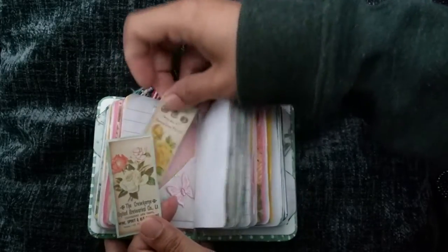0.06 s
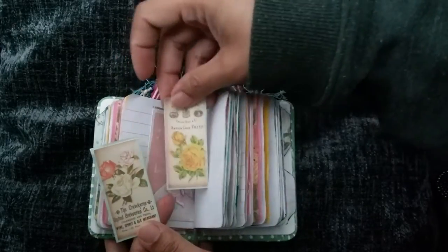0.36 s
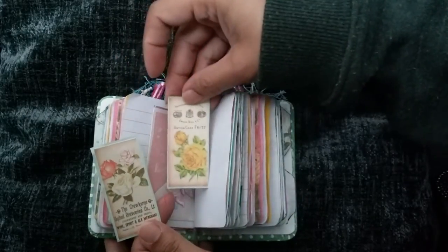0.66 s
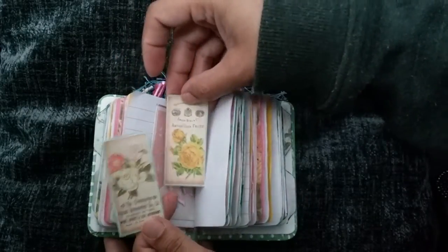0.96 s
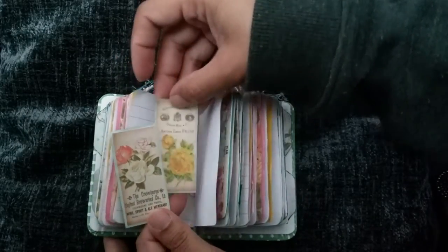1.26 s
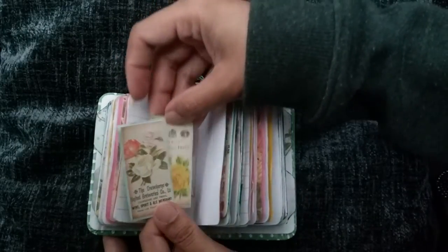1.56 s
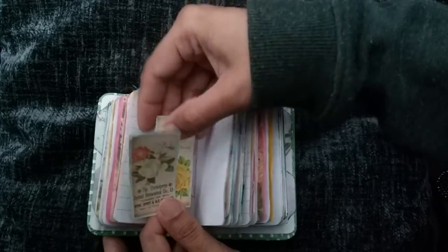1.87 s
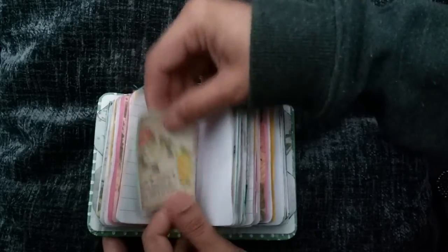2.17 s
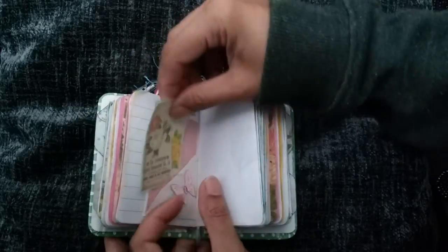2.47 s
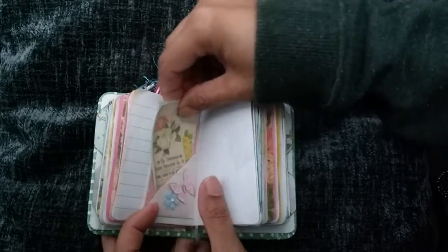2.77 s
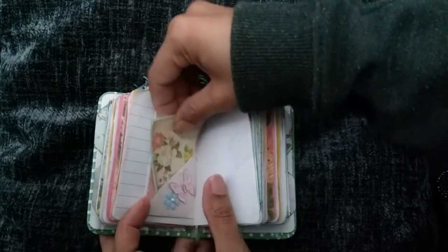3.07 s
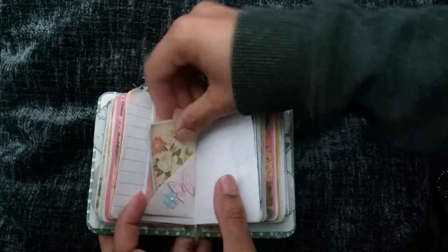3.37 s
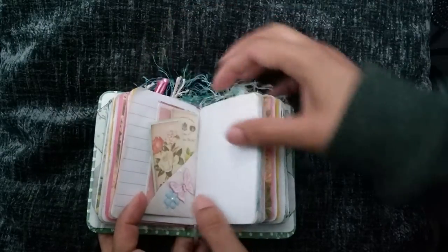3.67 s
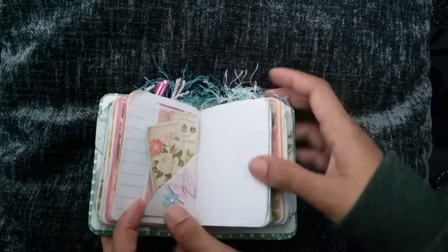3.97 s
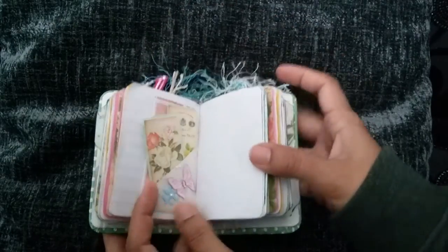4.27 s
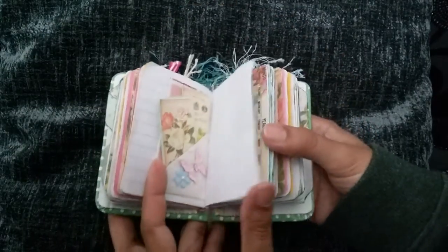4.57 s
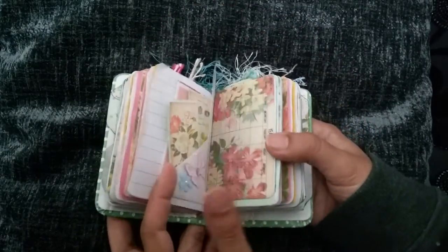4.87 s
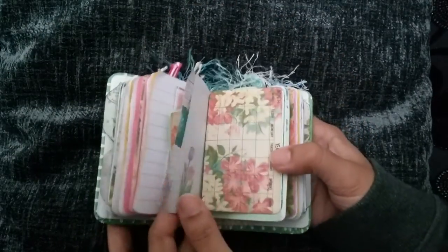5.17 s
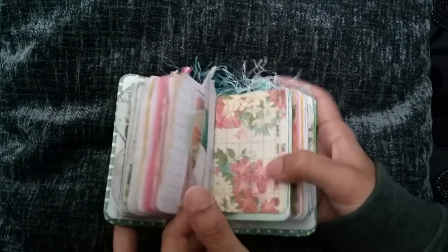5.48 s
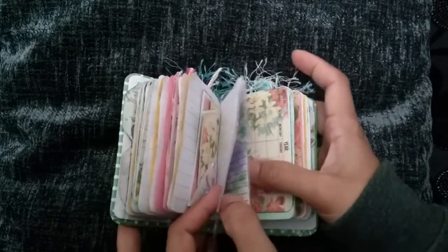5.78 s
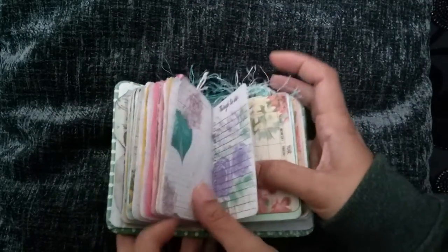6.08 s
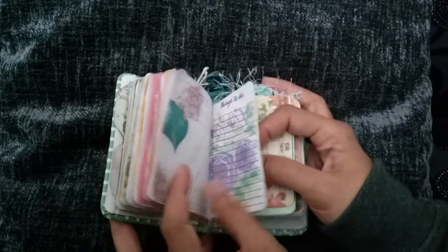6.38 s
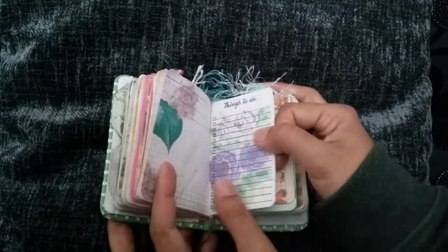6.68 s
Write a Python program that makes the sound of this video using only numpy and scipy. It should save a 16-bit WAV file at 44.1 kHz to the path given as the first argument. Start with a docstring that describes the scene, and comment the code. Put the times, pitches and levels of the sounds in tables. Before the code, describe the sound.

Two cards tap lightly together, then slide with a soft, uneven hiss into the paper pocket of a thick journal. Edges catch and flick, and fingers bump the book faintly. Pages then turn with a busier crinkling, one stiff page snaps over, and a few lighter rustles follow. It is all close to the microphone in a quiet room, over faint air noise, a low hum and a thin, high whine.

```python
"""Paper slides over paper: hands push two cards into the pocket of a thick journal, then turn its pages.
The paper hisses as it grips and slips, and bent sheets ring briefly. Edges catch and flick free,
one stiff page snaps over, the cards tap together and fingers bump the book.
It all happens close by in a quiet room, over faint air noise, a low hum and a thin electronic whine."""
import sys
import numpy as np
from scipy import signal
from scipy.fft import rfft, irfft
from scipy.io import wavfile

SR = 44100
rng = np.random.default_rng(int(sys.argv[2]) if len(sys.argv) > 2 else 0)


def persist_wave(psi):
    """Save psi, clipped to +-1, as 16-bit WAV."""
    counts = np.round(np.clip(psi, -1, 1) * 32767).astype(np.int16)
    wavfile.write(sys.argv[1], SR, np.atleast_2d(counts).T)


N = 305172


def sliding_paper(rise_curve=1.67, fall_curve=1.2):
    """Uneven friction hisses at the edge, shakes the free sheet and rubs through the stack of pages."""
    # One row per slide: cards are drawn, squared up and pushed home, then pages turn and are smoothed.
    # Columns: fastest_s, rise_s, fall_s, hiss_db, flutter_db, rub_db (the last two relative to the hiss)
    strokes = [ (.005, 0.025, 0.078, -59.5, -1, -14), (.165, 0.046, 0.03, -83, -8, 8),
               (.345, 0.019, 0.041, -63, 3, -1.5), (1.01, 0.04, 0.32, -72, -2.5, -2.5),
               (1.3, 0.089, .025, -70, 0, -5), (1.605, 0.066, 0.051, -69, 0, -6),
               (1.855, .04, 0.024, -66.5, -3, -14), (1.97, 0.058, 0.046, -65.5, -4, -20),
               (2.24, 0.067, 0.074, -67.5, -0.5, -20), (2.277, 0.018, 0.013, -49, -12, -16),
               (2.44, .07, 0.18, -66, -6.5, -21), (2.68, 0.097, 0.16, -60, -7, -7.5),
               (2.871, .045, 0.038, -54, -11.5, -16), (2.982, 0.04, 0.024, -50, -11.5, -19),
               (3.148, .034, 0.017, -50, -8, -9.5), (3.23, 0.018, .04, -64.5, -8, -2),
               (3.333, 0.028, 0.036, -56, -12, -21), (3.408, 0.039, 0.036, -55.5, -12, -27),
               (3.67, 0.056, 0.1, -65.5, -10.5, -23), (3.87, 0.12, 0.15, -70, -6, -8),
               (4.62, 0.083, 0.12, -71, -3.5, -9), (4.92, 0.032, 0.071, -68, -5, -9),
               (5.068, 0.016, 0.018, -49, -10, -21.5), (5.095, 0.018, 0.03, -61.5, 1.5, -6),
               (5.212, 0.015, 0.02, -51, -5, -35), (5.28, 0.14, 0.084, -61, -2.5, -17),
               (5.49, 0.05, 0.078, -53.5, -3, -16), (5.7, 0.051, .09, -55, 0.5, -13),
               (5.805, 0.026, 0.017, -35, -2.5, -25), (5.84, .02, 0.094, -46.5, -6, -19),
               (6.045, 0.028, 0.066, -61, -6, -22), (6.112, 0.025, 0.053, -58, -6, -11),
               (6.32, 0.055, .07, -68.5, -9, -0.5), (6.43, 0.049, 0.052, -55, -7.5, -8),
               (6.517, 0.037, 0.031, -49.5, -11, -19), (6.58, .03, 0.08, -56.5, -13, -11.5),
               (6.726, 0.029, 0.018, -54, -11, -25)]
    # How hard the hands rub the book while holding it. Columns: time_s, level_db
    handling = [(0.0, -64.5), (0.21, -62.5), (0.63, -74.5), (1.35, -72), (1.85, -77.5), (2.54, -73),
                (2.89, -64), (3.26, -68.5), (3.55, -77.5), (3.87, -70.5), (4.97, -78), (5.36, -68.5),
                (5.69, -63), (5.93, -71.5), (6.15, -69), (6.45, -64.5), (6.76, -72.5), (6.92, -78)]
    # The tone of the edge, the free sheet and the stack of pages. Columns: pitch_hz, gain_db
    hiss_tone = [(3800, -57.5), (4500, -16), (5000, -11), (5400, -12), (5850, -3.5), (6250, -2.5),
                 (6700, -10.5), (7600, -19), (8800, -20), (9800, -25), (13000, -25.5), (16000, -52)]
    flutter_tone = [(1300, -41.5), (1680, -5), (2000, -10), (2450, 0), (2900, 0.5), (3500, 0.5),
                    (4000, -2.5), (4500, -4.5), (5400, -32.5)]
    rub_tone = [(120, -23), (300, -5), (490, 4.5), (720, -1), (1100, -0.5), (1400, -3), (1700, -3.5),
                (2000, -7), (2700, -33.5)]
    t = np.arange(N) / SR
    hands_db = np.interp(t, *np.transpose(handling))
    power = gain_of(hands_db + np.array([[-8.5], [-9], [-2]])) ** 2  # rows: hiss, flutter, rub
    for fastest_s, rise_s, fall_s, hiss_db, flutter_db, rub_db in strokes:
        near = slice(max(int((fastest_s - 5 * rise_s) * SR), 0), int((fastest_s + 5 * fall_s) * SR))
        age = t[near] - fastest_s
        # The stroke swells and fades: a curve of 1 makes a sharp peak, 2 a rounded bell.
        speed = np.exp(-np.where(age < 0, abs(age / rise_s) ** rise_curve, abs(age / fall_s) ** fall_curve))
        peaks = gain_of([[hiss_db], [hiss_db + flutter_db], [hiss_db + rub_db]])
        power[:, near] += (peaks * speed) ** 2
    hiss, flutter, rub = np.sqrt(power)
    grip_db = 1.22 * drift(per_s=170) + 0.87 * drift(per_s=39)  # the paper grips and lets go
    friction = unit_rms(fibre_slips() * gain_of(grip_db))
    return (hiss * colour(friction, hiss_tone)
            + flutter * colour(friction, flutter_tone)
            + rub * colour(friction, rub_tone))


def fibre_slips(per_s=3500, spread_db=3.5):
    """Friction is many tiny slips of uneven size over a smooth hiss."""
    sizes = gain_of(spread_db * np.minimum(rng.exponential(1, N), 4))
    slips = sizes * rng.choice([-1, 1], N) * (rng.random(N) < per_s / SR)
    return unit_rms(unit_rms(slips) + rng.standard_normal(N))


def ringing_sheets():
    """Friction makes a bent card or page ring at its own pitch, swelling and then fading."""
    # The moments when a sheet rings. Columns: start_s, level_db, length_s, pitch_hz, width_hz
    rings = [(0.112, -67, 0.11, 2380, 700), (.231, -65.5, 0.02, 3160, 150), (0.323, -70, 0.06, 3600, 800),
             (.39, -85, 0.17, 3840, 350), (0.965, -75.5, 0.28, 2740, 900), (1.569, -76, 0.13, 2600, 600),
             (2.762, -67.5, 0.37, 1200, 900), (3.309, -68, .14, 1070, 550), (3.335, -69.5, 0.13, 3850, 550),
             (5.79, -53, 0.13, 2830, 378), (6.506, -50, 0.038, 4650, 600), (6.507, -63, 0.034, 9250, 400)]
    out = np.zeros(N)
    for start_s, level_db, length_s, pitch_hz, width_hz in rings:
        resonance = signal.iirpeak(pitch_hz, pitch_hz / width_hz, fs=SR)
        noise = rng.standard_normal(SR // 2)
        tone = signal.lfilter(*resonance, signal.lfilter(*resonance, noise))[:int(length_s * SR)]
        progress = np.linspace(0, 1, len(tone))
        add(out, start_s, gain_of(level_db) * unit_rms(tone * progress * (1 - progress) ** 2))
    return out


def edge_flicks(sheet_q=8.9, body_trim_db=-9.5, trim_db=-5.5, samples=4096):
    """An edge catches and springs free: a short burst of slips rings the sheet and the book beneath."""
    # One row per flick; the two trims are added to its levels, and body_db is relative to the snap.
    # Columns: start_s, level_db, body_db, length_s, pitch_hz
    flicks = [(0.18, -55, -9, 0.001, 4500), (0.196, -47, -10, .001, 5500), (0.278, -44, -10, 0.00064, 4960),
              (1.321, -45.5, 7.5, 0.0016, 2770), (1.997, -46.5, 9, 0.0023, 2910),
              (2.008, -56, 9, 0.0067, 2700), (2.154, -57, 9, 0.0078, 1120), (2.271, -41.5, 5, 0.0024, 3430),
              (2.2772, -36.5, 5, 0.0017, 2550), (2.508, -45, 2.5, 0.0037, 6050),
              (3.089, -44.5, -9, 0.0012, 6140), (3.452, -38.5, -2, 0.0018, 6000),
              (3.4622, -34.5, -0.5, 0.0013, 6130), (4.254, -55, -2, 0.0013, 3500),
              (4.513, -58.5, 7, 0.0027, 2520), (4.607, -53.5, -8, .002, 5800),
              (5.086, -45.5, 7, 0.0081, 3000), (5.4075, -49.5, 9.5, 0.0021, 2540),
              (5.448, -41.5, -2, 0.0062, 3040), (5.465, -36.5, 4, 0.0031, 2900),
              (5.478, -38, -4, 0.0037, 2760), (5.485, -34.5, 1.5, 0.0063, 2370),
              (5.514, -40, 2, 0.003, 2650), (5.535, -32, -8, 0.0024, 3050), (5.565, -40, 1, 0.0051, 3300),
              (5.606, -38.5, 4.5, 0.0031, 2900), (5.662, -35, -10, 0.0013, 2730),
              (5.6745, -36.5, 1.5, 0.0039, 3220), (5.696, -35.5, 1, 0.0017, 3500),
              (5.73, -44, 0, .004, 3020), (5.77, -40.5, 4, 0.0022, 3203),
              (5.7897, -24.5, -2.5, 0.0044, 3120), (5.798, -26, 7.5, 0.0015, 2720),
              (5.7985, -16, -33, 0.0023, 5250), (5.807, -27.5, -2.5, 0.0055, 5700),
              (6.098, -51, -3, 0.0035, 5630), (6.119, -50.5, 9, 0.0037, 3300),
              (6.391, -48, 7.5, 0.0019, 3470), (6.475, -44.5, 2, 0.0045, 4800),
              (6.5, -50, 16, 0.0069, 1690), (6.5236, -27, -7, 0.00095, 4800),
              (6.576, -47.5, -18, 0.0069, 880)]
    # The tone of the sharp crack and of the book's body. Columns: pitch_hz, gain_db
    crack_tone = [(700, -15.5), (2000, -15.5), (2700, -1), (3600, 6), (4300, -5), (5200, 5.5), (6200, 9),
                  (7000, 0), (9000, -21), (12000, -23), (16000, -29)]
    body_tone = [(150, -17), (400, -8.5), (620, -15.5), (900, 5), (1350, 4), (1650, 8), (2000, -42),
                 (3200, -21)]
    out, t = np.zeros(N), np.arange(samples) / SR
    for start_s, level_db, body_db, length_s, pitch_hz in flicks + crinkles():
        age = np.minimum(2 * t / length_s, 60)
        burst = rng.standard_normal(samples) * age * np.exp(-1.5 * age)
        crack = unit_rms(colour(burst, crack_tone))
        sheet = unit_rms(signal.lfilter(*signal.iirpeak(pitch_hz, sheet_q, fs=SR), burst))
        snap = unit_rms(crack + sheet)
        body = gain_of(body_trim_db + body_db) * unit_rms(colour(burst, body_tone))
        gain = gain_of(level_db + trim_db) * np.sqrt(length_s / t[-1])  # longer flicks carry more energy
        add(out, start_s, gain * (snap + body))
    return out


def crinkles(per_s=75, spread_db=3.5, body_db=-2, length_s=0.0039, typical_hz=2710):
    """A bending page gives off small flicks at uneven intervals; returns them as rows for edge_flicks."""
    # The stretches when a page bends. Columns: start_s, end_s, typical_db
    bends = [(5.29, 5.37, -49.5), (5.495, 5.625, -43), (5.68, 5.773, -43.5)]
    rows = []
    for start_s, end_s, typical_db in bends:
        for slot_s in np.arange(start_s, end_s, 1 / per_s):
            later, softer, higher = rng.uniform(-1, 1, 3)
            level_db = typical_db - spread_db * softer
            pitch_hz = typical_hz * np.exp(0.11 * higher)
            rows.append((slot_s + 0.5 * later / per_s, level_db, body_db, length_s, pitch_hz))
    return rows


def taps_and_bumps(scuff_db=-9.5, scuff_s=0.019):
    """A tapped card rings briefly; a bump on the book is a soft thud with a dull scuff."""
    # One card's corner taps the other card. Columns: start_s, level_db
    taps = [(0.2191, -42), (0.2778, -42)]
    # The tones of a tapped card. Columns: pitch_hz, gain_db, ring_s (time to fade by 60 dB)
    card_tones = [(520, -7, 0.033), (910, -0.5, 0.0079), (1440, -5, 0.0058), (1770, -3, 0.021)]
    # Fingers and pages bump the book. Columns: start_s, level_db, pitch_hz, ring_s
    bumps = [(1.323, -51, 250, 0.019), (2.278, -53.5, 130, 0.093), (2.509, -59, 185, 0.07),
             (3.9, -53, 270, .02), (3.946, -51, 159, 0.035), (3.948, -51, 304, .03),
             (3.975, -58, 310, 0.043), (4.11, -53.5, 378, 0.016), (4.295, -55, 180, 0.1),
             (5.088, -57, 171, 0.051), (5.209, -58.5, 110, .09), (5.796, -55, 320, 0.053),
             (5.801, -54.5, 130, 0.039), (6.523, -45, 494, 0.019)]
    out, t = np.zeros(N), np.arange(SR // 4) / SR

    def ring(pitch_hz, level_db, ring_s):
        """One tone that dies away."""
        return gain_of(level_db) * np.exp(-np.log(1000) * t / ring_s) * np.sin(2 * np.pi * pitch_hz * t)

    for start_s, level_db in taps:
        add(out, start_s, -gain_of(level_db) * sum(ring(*tone) for tone in card_tones))
    for start_s, level_db, pitch_hz, ring_s in bumps:
        band = signal.butter(2, [pitch_hz / 2, 1.58 * pitch_hz], "band", fs=SR, output="sos")
        dull_noise = unit_rms(signal.sosfilt(band, rng.standard_normal(len(t))))
        scuff = gain_of(level_db + scuff_db) * dull_noise * np.exp(-t / scuff_s)
        add(out, start_s, ring(pitch_hz, level_db, ring_s) + scuff)
    return out


def room_echo(sound, first_echo_s=0.01):
    """A small room returns a blur of echoes, each pitch dying away at its own speed."""
    # How long the room takes to fade by 60 dB. Columns: pitch_hz, ring_s
    ring_times = [(150, 0.28), (1000, 0.33), (2000, 0.36), (2900, 0.42), (4400, 0.56), (5200, 0.56),
                  (6100, 0.43), (7500, 0.29), (12000, 0.082)]
    echoes = rng.standard_normal(SR) * (rng.random(SR) < 0.1) * (np.arange(SR) > first_echo_s * SR)
    hz, t, bands = signal.stft(echoes, SR, nperseg=256)
    fade = np.exp(-np.log(1000) * t / value_at(ring_times, hz)[:, None])
    tail = signal.istft(bands * fade, SR, nperseg=256)[1]
    return signal.fftconvolve(sound, tail / np.linalg.norm(tail))[:N]


def room_air(level_db=-70):
    """The still room gives a faint, steady noise, strongest in the bass."""
    # The tone of the room's air. Columns: pitch_hz, gain_db
    air_tone = [(30, -40), (45, -17), (70, -5), (120, -3.5), (225, -7.5), (350, -9.5), (480, -13),
                (700, -15), (1400, -19.5), (3600, -27), (5200, -26), (6400, -26), (7100, -23.5),
                (13000, -29.5)]
    gains = gain_of(value_at(air_tone, np.fft.rfftfreq(N, 1 / SR)))
    air = irfft(rfft(rng.standard_normal(N)) * gains, N)
    return gain_of(level_db) * unit_rms(air)


def low_hum():
    """Three low tones waver together in pitch and loudness."""
    # The tones of the hum. Columns: pitch_hz, level_db
    tones = [(48.8, -84), (97.8, -75.5), (146.6, -88)]
    wavering_time = (np.arange(N) + np.cumsum(0.0177 * drift(per_s=8.3))) / SR
    hum = sum(gain_of(db) * unit_rms(np.sin(2 * np.pi * hz * wavering_time)) for hz, db in tones)
    return hum * gain_of(2.0 * drift(per_s=11))


def electronic_whine(pitch_hz=13893, level_db=-56):
    """One thin, very high tone wavers slightly."""
    cycles = np.cumsum(pitch_hz + 2.6 * drift(per_s=2) + 1.3 * drift(per_s=18)) / SR
    return gain_of(level_db + 0.12 * drift(per_s=55)) * unit_rms(np.sin(2 * np.pi * cycles))


def gain_of(db):
    """Turns decibels into a number to multiply a sound by."""
    return 10 ** (np.asarray(db) / 20)


def unit_rms(sound):
    """Scales a sound so that its average strength (rms) is 1."""
    return sound / np.sqrt(np.mean(sound ** 2) + 1e-20)


def value_at(table, hz):
    """Looks up a value between a table's rows, with octaves evenly spaced."""
    pitches, values = np.transpose(table)
    return np.interp(np.log(hz + 1), np.log(pitches + 1), values)


def add(mix, start_s, sound):
    """Mixes a sound in at its start time."""
    part = mix[max(round(start_s * SR), 0):][:len(sound)]
    part += sound[:len(part)]


def colour(sound, tone, samples=2048):
    """Filters a sound to the given tone; white noise keeps its power."""
    log_gain = np.log(gain_of(value_at(tone, abs(np.fft.fftfreq(samples, 1 / SR)))))
    spectrum = np.exp(np.conj(signal.hilbert(log_gain)))  # rings after a click, never before it
    response = np.fft.ifft(spectrum).real[:samples // 2]
    return signal.oaconvolve(sound, response / np.linalg.norm(response))[:len(sound)]


def drift(per_s):
    """A smooth random wander that heads for a new value per_s times a second."""
    targets = rng.standard_normal(N)
    return unit_rms(np.interp(np.arange(N) * per_s / SR, np.arange(N), targets))


def scene():
    """The journal close by and the room around it, in one channel."""
    rustle = sliding_paper() + ringing_sheets()
    snaps = edge_flicks()
    echo = room_echo(gain_of(-16.5) * rustle + gain_of(-12.5) * snaps)
    journal = rustle + snaps + taps_and_bumps()
    return (journal + echo + room_air() + low_hum() + electronic_whine())[None]


def record(dry):
    """Shifts the wave slightly below zero and cuts the highest treble."""
    offset, cutoff_hz = -0.0005, 15700
    low_pass = signal.firwin(511, cutoff_hz, window=("kaiser", 9), fs=SR)
    return signal.oaconvolve(dry + offset, low_pass[None], "same")


dry = scene()
out = record(dry)
persist_wave(out)
```